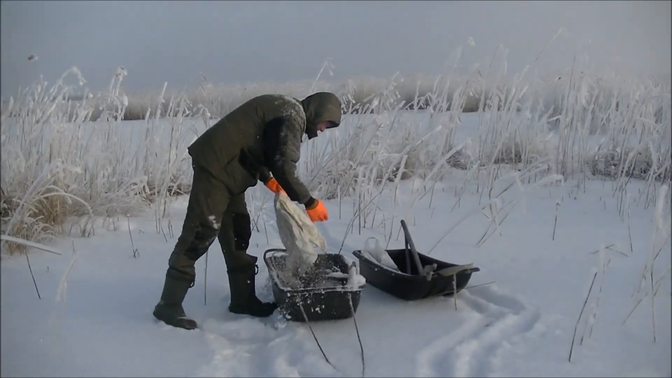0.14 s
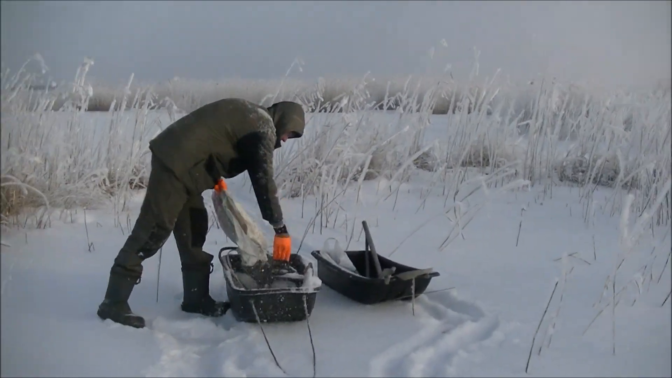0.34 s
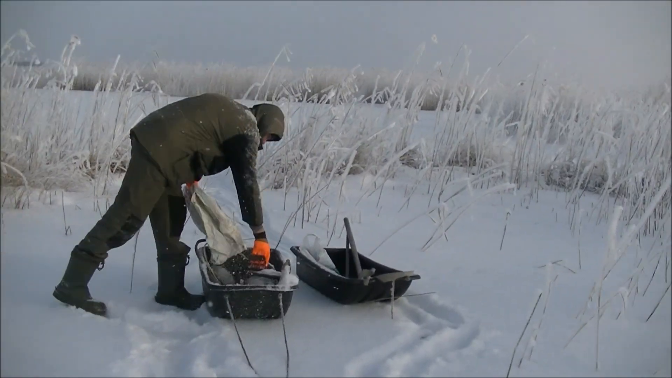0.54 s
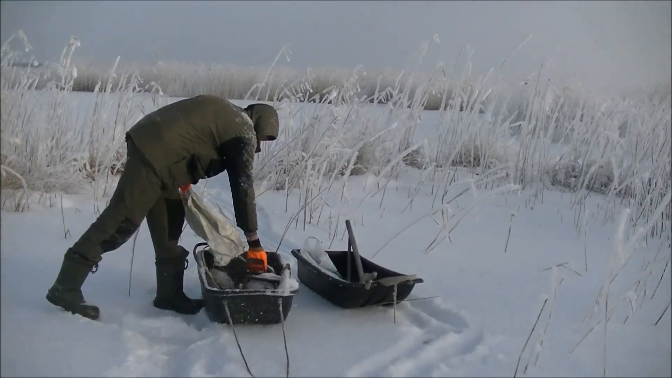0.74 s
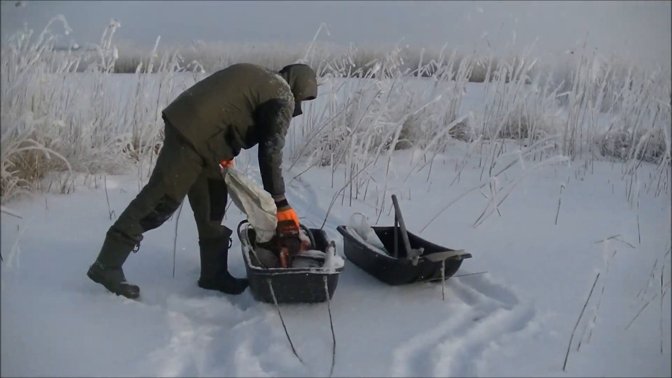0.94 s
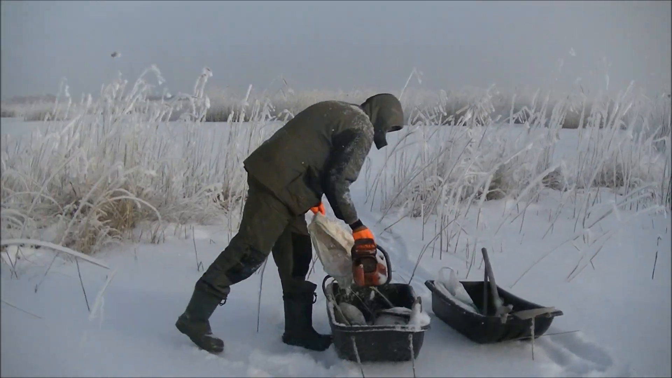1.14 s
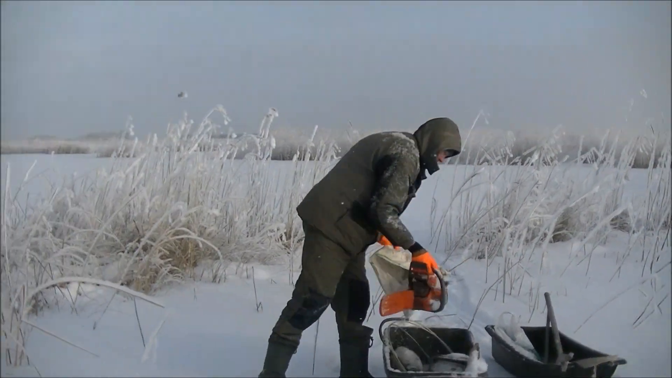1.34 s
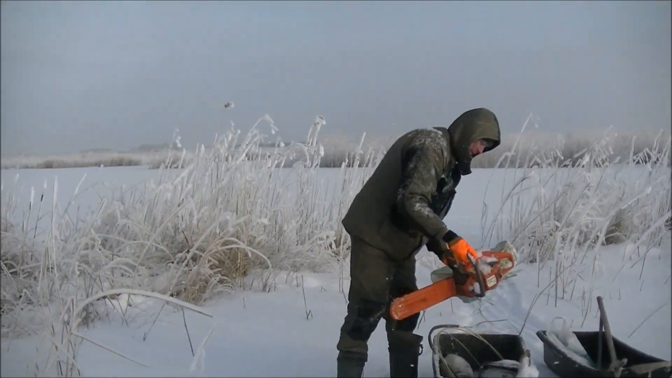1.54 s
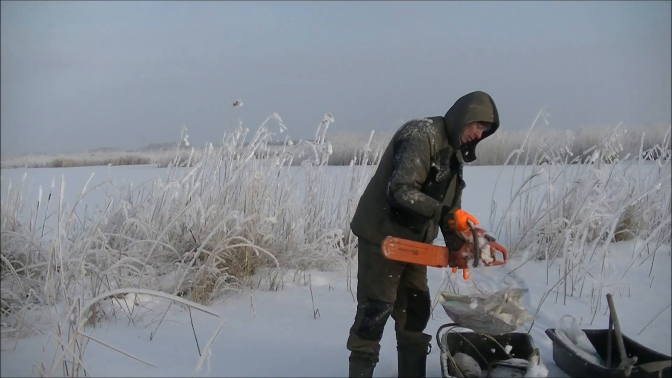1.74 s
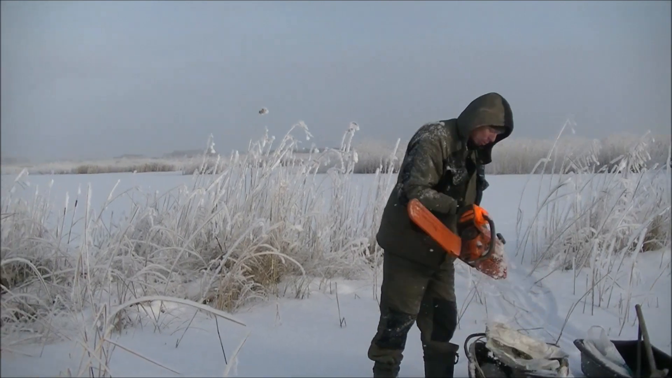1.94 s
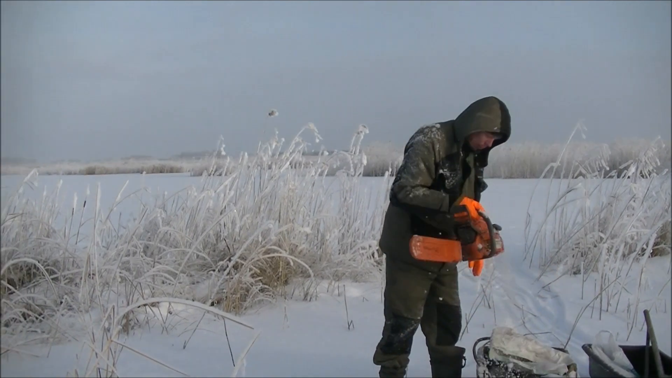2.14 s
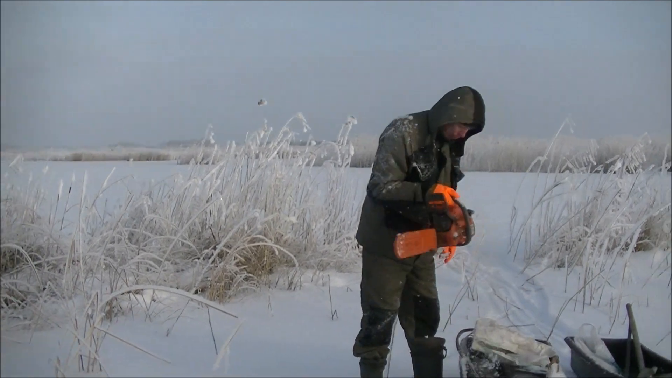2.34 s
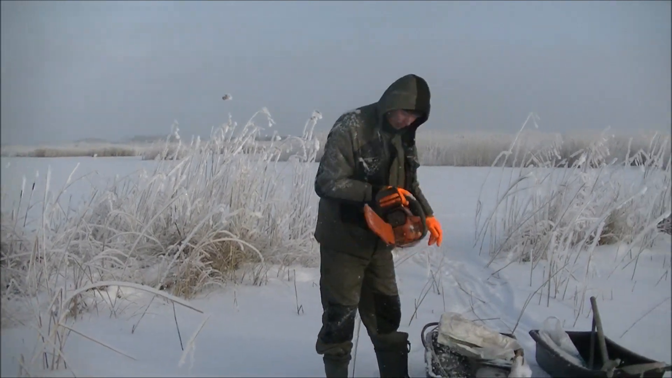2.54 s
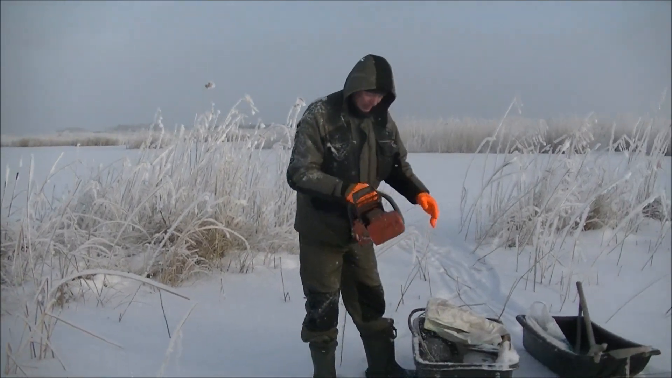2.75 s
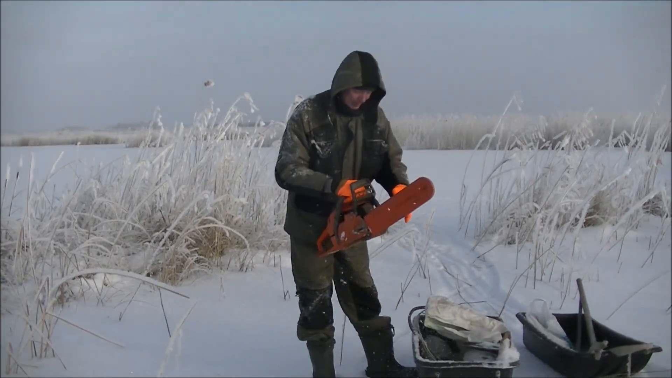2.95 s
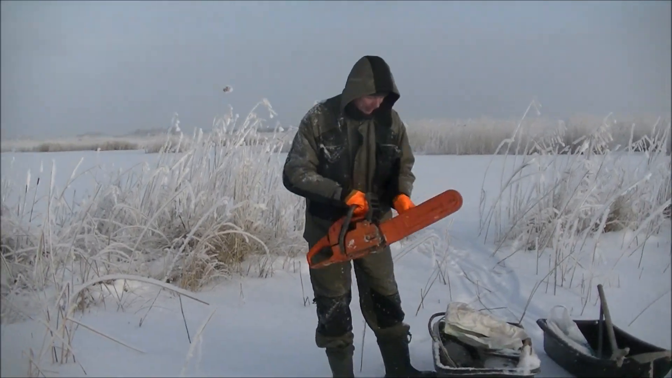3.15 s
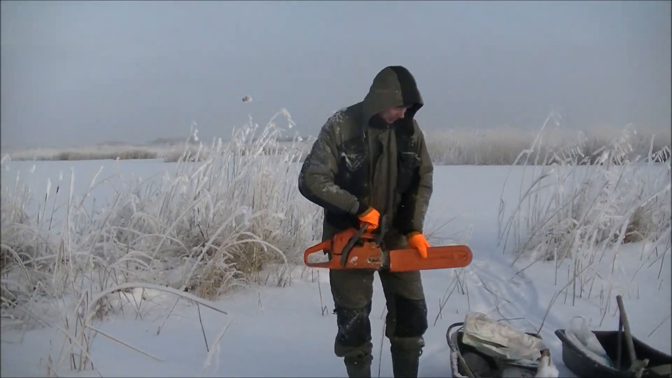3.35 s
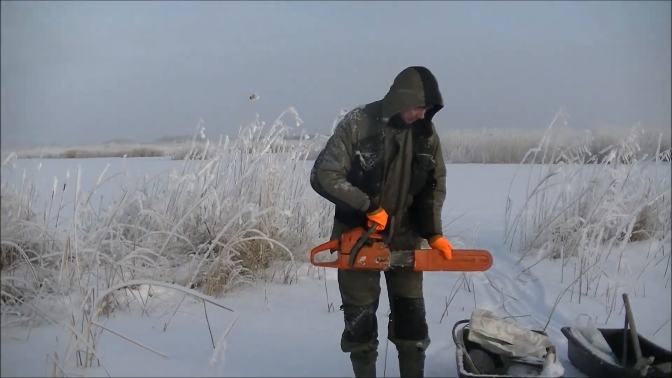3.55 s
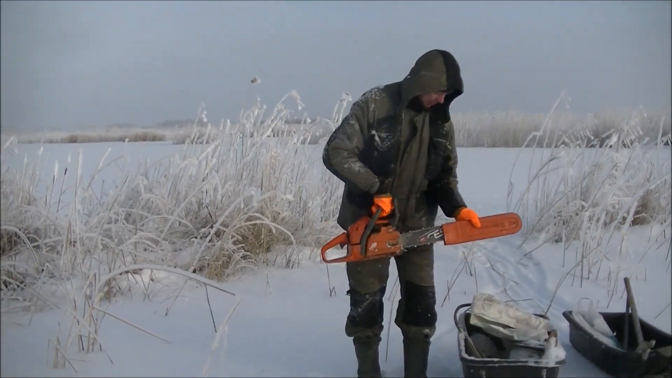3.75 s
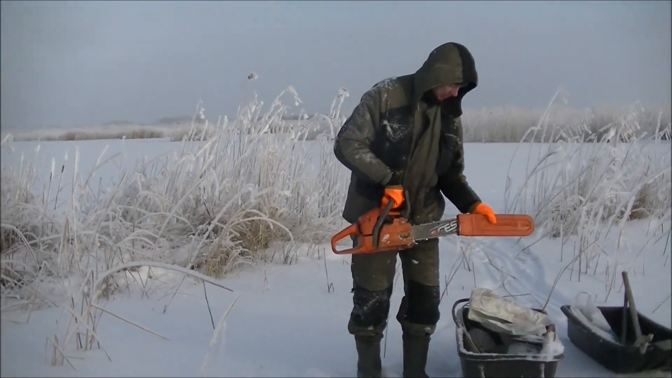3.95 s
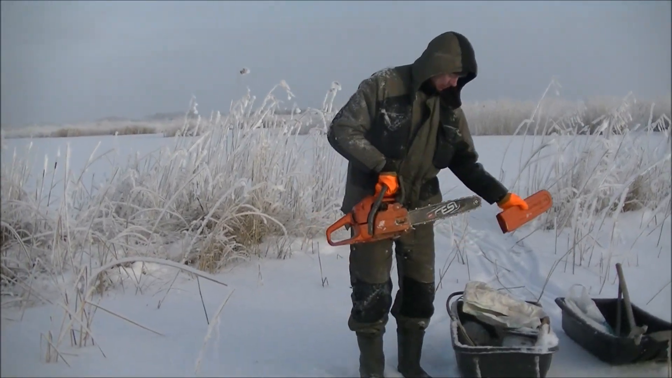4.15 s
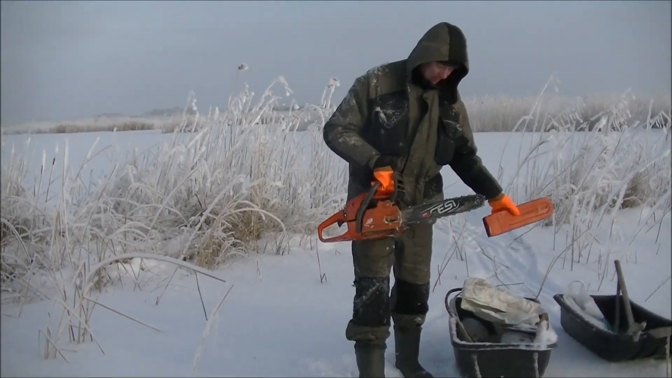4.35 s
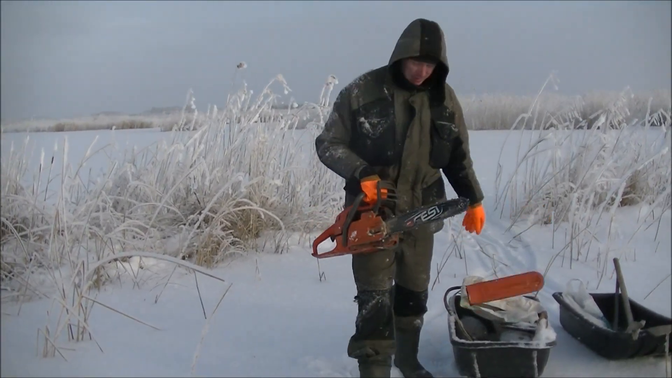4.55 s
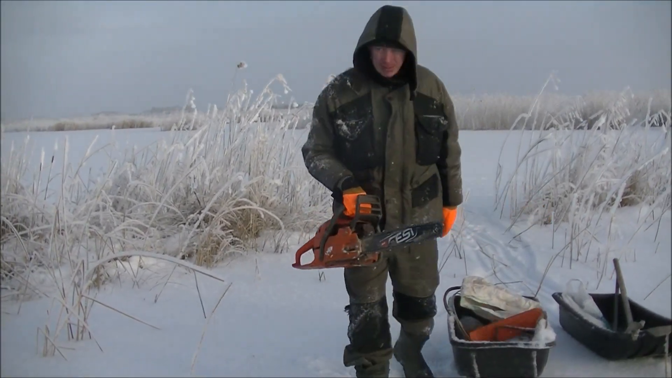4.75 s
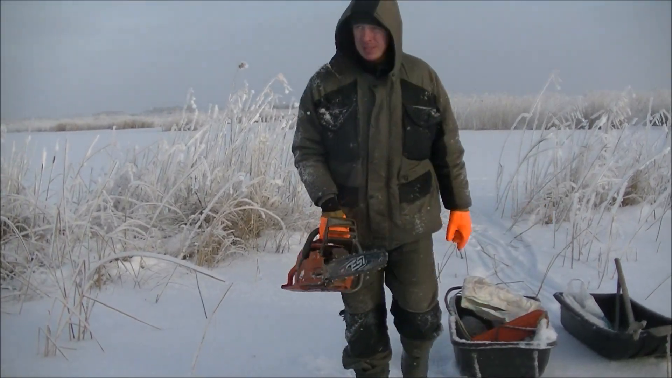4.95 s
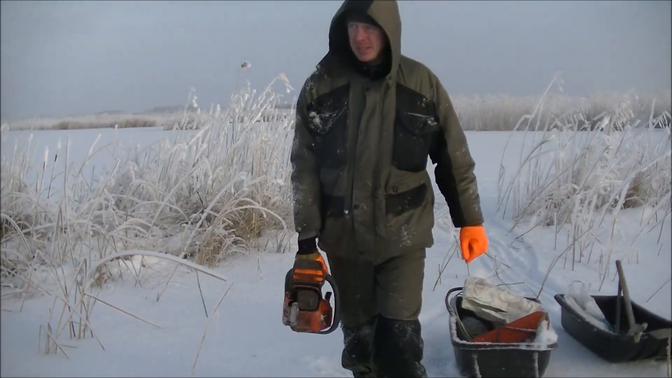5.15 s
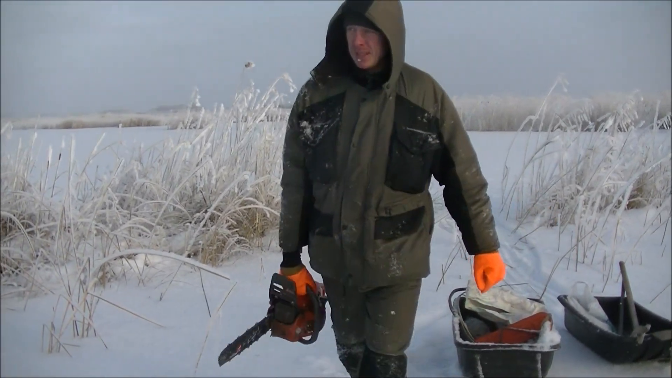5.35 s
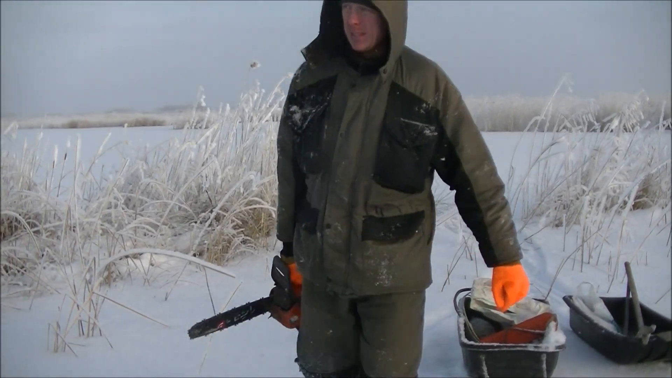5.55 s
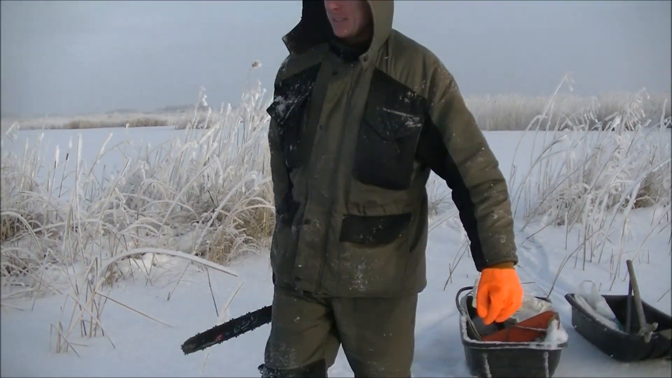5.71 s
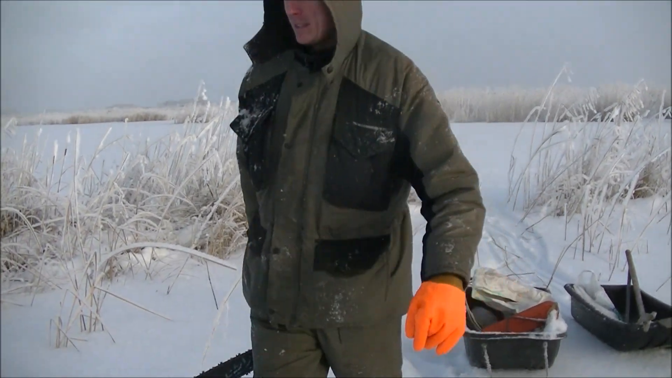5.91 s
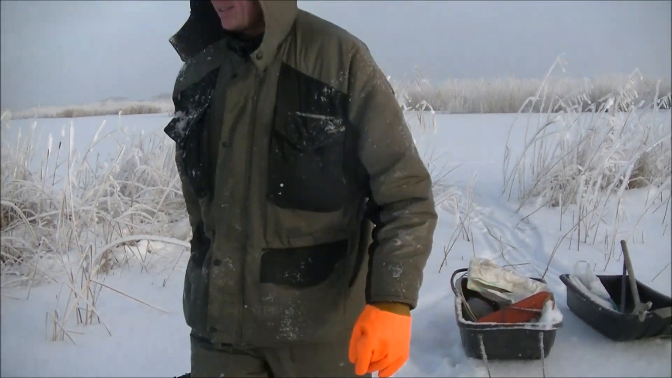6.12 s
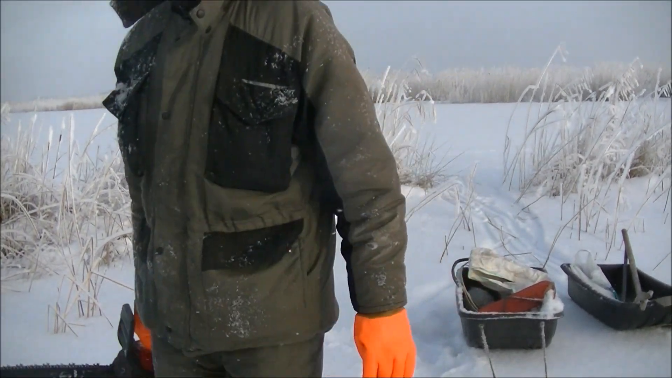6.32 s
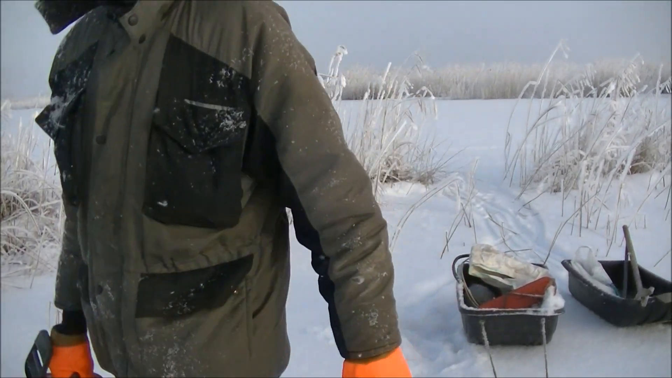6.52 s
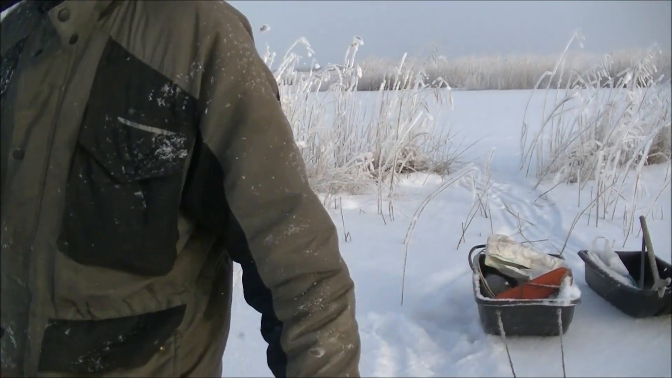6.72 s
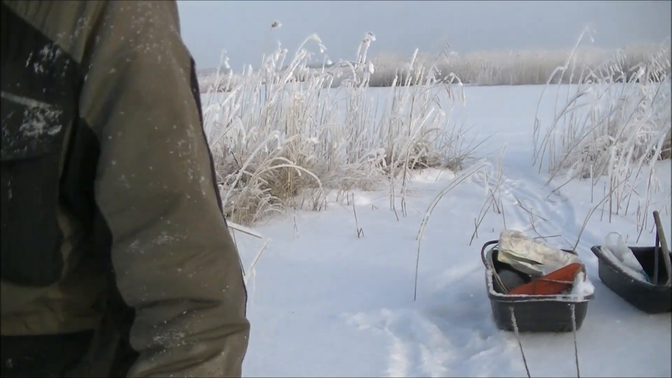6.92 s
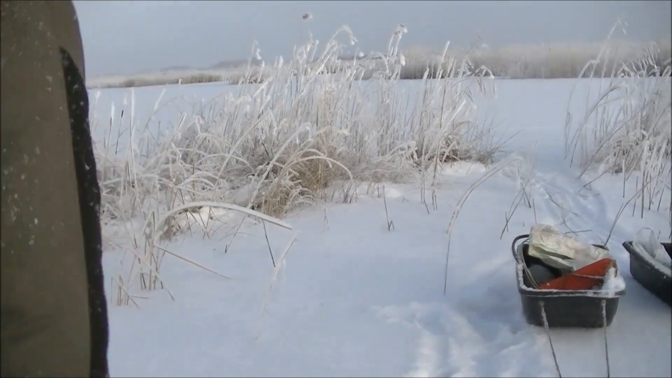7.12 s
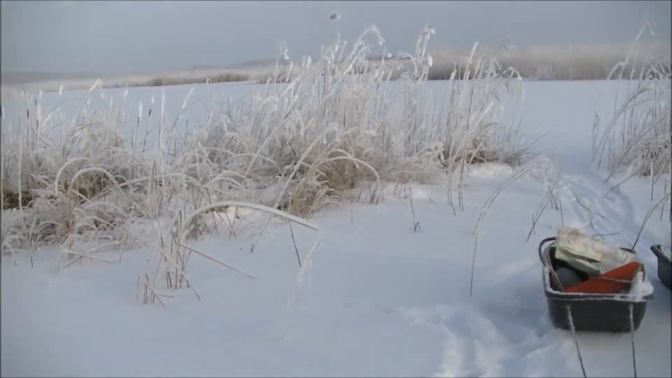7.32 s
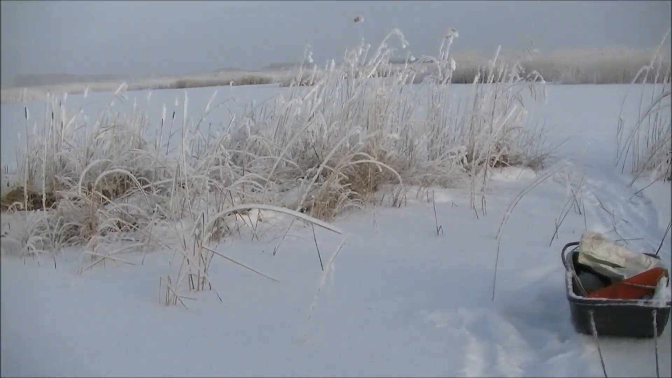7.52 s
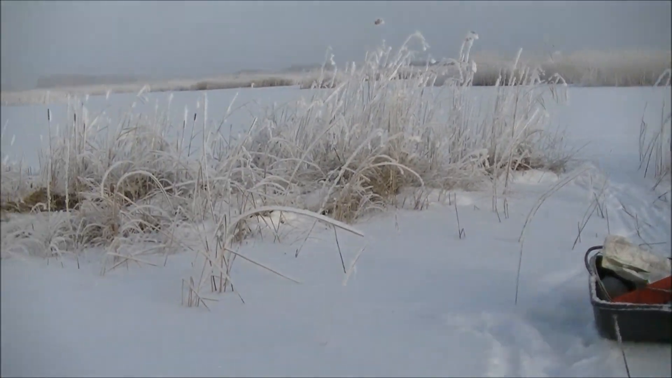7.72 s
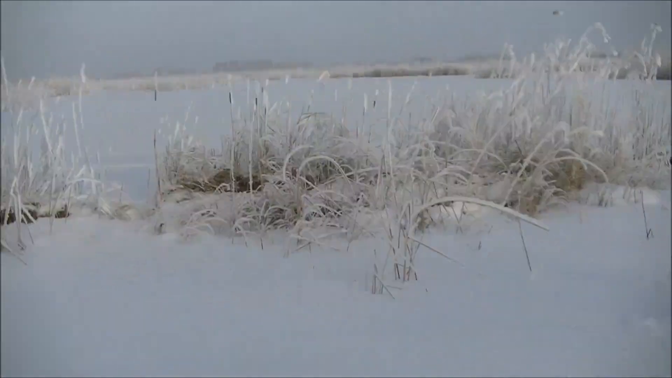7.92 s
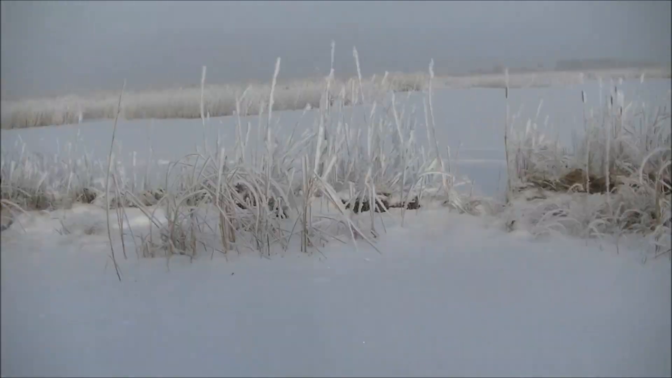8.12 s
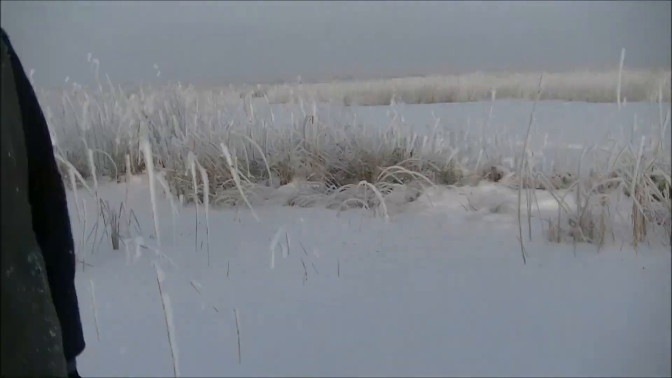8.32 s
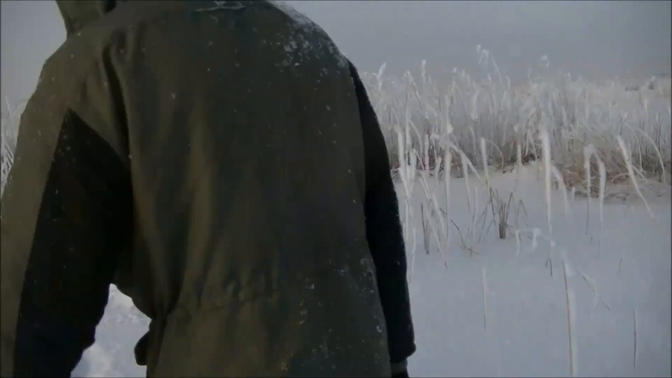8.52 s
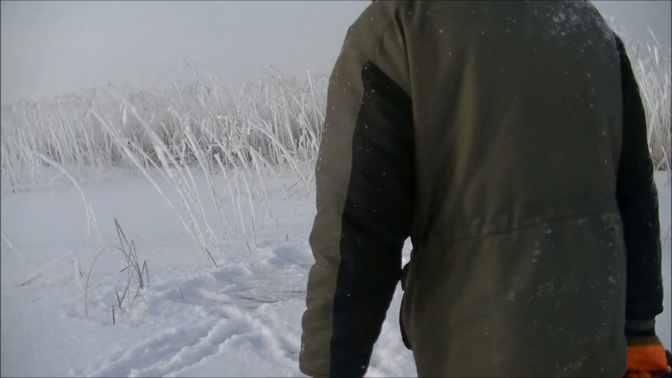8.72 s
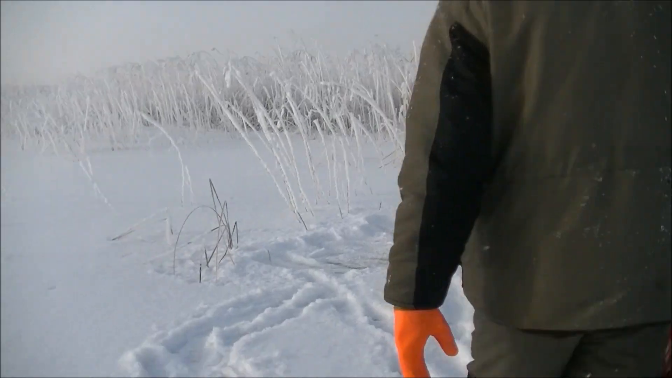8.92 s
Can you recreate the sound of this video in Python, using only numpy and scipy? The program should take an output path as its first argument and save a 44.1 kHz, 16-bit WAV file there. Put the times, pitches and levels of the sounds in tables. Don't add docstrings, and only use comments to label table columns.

```python
import sys
import numpy as np
from scipy import signal
from scipy.fft import rfft, irfft
from scipy.io import wavfile

SR = 44100
rng = np.random.default_rng(int(sys.argv[2]) if len(sys.argv) > 2 else 0)


def unload_wav(signal):
    wavfile.write(
        sys.argv[1],
        SR,
        np.round(np.clip(np.atleast_2d(signal).T, -1, 1) * 32767).astype(np.int16),
    )


def voltage_ratio(decibels):
    exponent = np.asarray(decibels, float) / 20
    return 10 ** exponent


N = 399987
SWELL_DB = 25
PASS_S = 6.97


def rms_one(x):
    return x / np.sqrt(np.mean(x ** 2) + 1e-20)


def at_hz(points, hz):
    point_hz, value = np.transpose(points)
    return np.interp(np.log(hz + 1), np.log(point_hz), value)


def band(x, low_hz, high_hz):
    return signal.sosfilt(signal.butter(2, [low_hz, high_hz], "band", fs=SR, output="sos"), x)


def colour(x, spectrum):
    size = 8192
    cepstrum = irfft(np.log(voltage_ratio(at_hz(spectrum, np.fft.rfftfreq(size, 1 / SR)))))
    cepstrum[1:size // 2] *= 2
    cepstrum[size // 2 + 1:] = 0
    response = irfft(np.exp(rfft(cepstrum)))[None, :size // 2]
    return signal.fftconvolve(x, response, axes=1)[:, :x.shape[1]]


def resonate(x, hz, width_hz):
    r = np.exp(-np.pi * width_hz / SR)
    top = [(1 - r * r) / 2, 0, (r * r - 1) / 2]
    return signal.lfilter(top, [1, -2 * r * np.cos(2 * np.pi * hz / SR), r * r], x)


def drift(rate_hz):
    r = np.exp(-2 * np.pi * rate_hz / SR)
    wander = signal.lfilter([1], [1, -2 * r, r * r], rng.standard_normal(N + SR))
    return rms_one(wander[SR:])


def burst(length, rise_s, t60, spike):
    t = np.arange(length) / SR
    x = rng.standard_normal((2, length)) * voltage_ratio(2.9 * rng.standard_normal(length))
    x = x * np.minimum(t / max(rise_s, 1e-5), 1)
    x = x * voltage_ratio(-60 * np.maximum(t - rise_s, 0) / t60)
    x[0, round(rise_s * SR)] += spike
    return x


def add(out, s, x, peak_db):
    i = max(round(s * SR), 0)
    out[:, i:i + x.shape[1]] += (x * voltage_ratio(peak_db) / np.abs(x[0]).max())[:, :N - i]


def grains(per_s, spread_db, clump_db, clump_rate):
    born = rng.random((2, N)) < per_s / SR
    sizes = voltage_ratio(spread_db * np.minimum(rng.exponential(1, (2, N)), 4.2))
    sizes = sizes * rng.choice([-1, 1], (2, N))
    return rms_one(born * sizes * voltage_ratio(clump_db * drift(clump_rate)) + 1e-9)


def creaks(source):
    dealt = rng.integers(0, 6, N)
    pitches = enumerate(np.geomspace(500, 4000, 6))
    return rms_one(sum(resonate(source * (dealt == k), hz, 0.59 * hz) for k, hz in pitches))


# heel fully down in seconds, sinking time in seconds,
# rolling time in seconds, heel level in dB, push-off level in dB.
BOOT_STEPS = [
    (0.0, .1, 0.45, -52, -44.5),
    (5.237, 0.36, 0.27, -46, -42.5),
    (5.88, 0.2, 0.28, -42, -38.5),
    (6.366, 0.28, 0.13, -43.5, -47),
    (6.535, 0.2, 0.27, -40, -36.5),
    (7.175, .24, 0.26, -37.5, -35.5),
    (7.8, 0.12, 0.26, -37, -37.5),
    (8.284, 0.38, 0.37, -38, -37.5),
    (9.069, 0.24, .1, -34, -33.5),
]


def footsteps():
    # lows in dB, highs in dB
    sink, heel, push, trickle = (-0.5, -11), (-6.5, 1.5), (-4.5, -1.6), (0.42, -4)
    lift = (-7.5, -4.5)
    moves = []
    for s, sink_s, roll_s, heel_db, push_db in BOOT_STEPS:
        off = s + roll_s + 0.027
        trickle_db = push_db - 19.5
        moves.append([(s - sink_s, heel_db - SWELL_DB, *sink),
                      (s, heel_db, *heel),
                      (s + 0.31 * roll_s, heel_db - 1.5, *push),
                      (s + 0.86 * roll_s, push_db, *push),
                      (s + roll_s, push_db - 1.5, *lift),
                      (off, trickle_db, *trickle),
                      (off + 0.21, trickle_db - 22, *trickle)])
    return moves


# time in seconds, effort in dB,
# speed as brightness in dB.
GEAR_HANDLING = [(0.0, -46, -3), (0.6, -48.5, -5), (0.75, -58.5, 3), (0.86, -44.5, 2.5), (1.29, -44, -1),
                 (1.52, -53.5, 6), (1.781, -50, -2.5), (2.0, -48, -3), (2.25, -53.5, -9), (2.53, -57.5, -7),
                 (2.69, -67, -19), (2.8, -53, -3), (3.17, -56, -7.5), (3.25, -60, 1), (3.4, -47.5, -2),
                 (3.95, -58, -4), (4.23, -63, -1), (5.1, -56, -2)]


def handling():
    return [[(s, db, -3.5, highs_db) for s, db, highs_db in GEAR_HANDLING]]


def swell(s, rise_s, fall_s, db, *tone):
    return [(s - rise_s, db - SWELL_DB, *tone), (s, db, *tone), (s + fall_s, db - SWELL_DB, *tone)]


# peak in seconds, rise in seconds, fall in seconds, level in dB, highs in dB.
SINGLE_SCRAPES = [(1.008, 0.16, 0.28, -31.5, -10), (1.207, .15, 0.19, -52, 7),
                  (1.68, 0.43, 0.15, -40.5, -1), (4.659, 0.27, 0.074, -42, -2.5),
                  (4.719, 0.053, 0.18, -34.5, -7.5), (4.86, 0.62, 0.59, -49, 0.5),
                  (2.35, 0.25, 0.061, -54, -7), (6.875, 0.11, 0.075, -52.5, 3),
                  (7.495, 0.042, 0.074, -49, 0), (7.638, 0.19, 0.29, -46, -3),
                  (8.74, 0.49, 0.26, -43.5, -6.5), (8.895, 0.18, 0.14, -44, -5.5)]


def scrapes():
    return [swell(*row[:4], -7, row[4]) for row in SINGLE_SCRAPES]


# peak in seconds, rise in seconds, fall in seconds,
# rub level in dB, ring level in dB.
COVER_TUGS = [
    (3.429, 0.11, 0.16, -45, -34),
    (3.627, 0.097, 0.083, -31.5, -40),
    (3.802, 0.11, .11, -31.5, -35.5),
    (4.035, 0.031, 0.17, -35.5, -45),
    (4.1, 0.11, 0.02, -37, -33),
    (4.85, 0.051, 0.28, -61, -46.5),
]


def tug_rubs():
    return [swell(*row[:4], -12.5, -9.5) for row in COVER_TUGS]


def pressure():
    t = np.arange(0, N / SR + .002, .002)
    power = 1e-15
    for move in handling() + footsteps() + scrapes() + tug_rubs():
        s, db, lows_db, highs_db = np.transpose(move)
        tone = np.array([np.interp(t, s, lows_db), 0 * t, np.interp(t, s, highs_db)])
        level_db = np.interp(t, s, db, left=-150, right=-150)
        power = power + voltage_ratio(2 * (level_db + tone))
    return [np.interp(np.arange(N) / SR, t, np.sqrt(p)) for p in power]


# frequency in Hz, level in dB per Hz.
SLED_COLOUR = [(24, -51), (40, -32), (249, -1), (467, 0), (810, 2), (1440, -1), (2100, 3), (3060, 0),
               (4030, 8.5), (5310, 1.5), (7000, -6), (8340, -15), (9220, -11.5), (14100, -17),
               (16000, -11.5)]
COMING_COLOUR = [(59, -47), (100, -14), (308, -6.5), (433, -12), (691, -5), (1250, -9.5), (2420, -4.5),
                 (4110, -1.5), (5420, -2), (6420, -2), (8280, -15), (13500, -12.5), (16000, -19)]
BEHIND_COLOUR = [(60, -44), (100, -13), (300, -2.5), (520, -7), (750, -5), (1300, -4.5), (2400, -3),
                 (3300, -5), (4300, 1.5), (4850, 6.5), (5450, 1.5), (6300, 1.5), (8500, -10.5),
                 (13500, -9.5), (16000, -11.5)]


def friction(source, flicker_db):
    low_gain, mid_gain, high_gain = pressure()
    cuts = [0, round(.76 * SR), round(5.65 * SR), round(PASS_S * SR), N]
    colours = BEHIND_COLOUR, SLED_COLOUR, COMING_COLOUR, BEHIND_COLOUR
    ranges = []
    for a, b, spectrum in zip(cuts, cuts[1:], colours):
        x = colour(source[:, a:b], spectrum)
        highs = band(band(x, 5600, 22000), 5600, 22000)
        ranges.append([rms_one(r) for r in (band(x, 36, 980), band(x, 1440, 4690), highs)])
    lows, mids, highs = np.concatenate(ranges, axis=2)
    lows = lows * voltage_ratio(-2 + flicker_db * drift(20))
    mids = mids * voltage_ratio(flicker_db * drift(31))
    return low_gain * lows - mid_gain * mids + high_gain * highs


# time
# in seconds, peak in dB, ring in Hz.
SNOW_CRUNCHES = [(0.032, -32.5, 650), (0.108, -34, 2120), (0.16, -29, 800), (0.199, -35, 1180),
                 (0.245, -32, 1160), (0.308, -33, 800), (0.357, -33, 705), (0.409, -33, 813),
                 (0.436, -32, 825), (0.468, -30, 900), (0.489, -28, 870), (1.274, -31, 818),
                 (1.416, -30, 1200), (1.483, -31, 720), (1.566, -33, 1670), (2.217, -37, 646),
                 (2.412, -41, 850), (2.455, -41, 800), (2.484, -42, 501), (2.56, -41, 800),
                 (5.013, -31.5, 636), (5.062, -29.5, 1070), (5.1, -32, 2190), (5.139, -33.5, 760),
                    (5.204, -32.5, 2190), (5.275, -29, 1830), (5.34, -29, 2150), (5.381, -27, 660),
                    (5.542, -28.5, 714), (5.548, -30, 800), (5.554, -31, 750), (5.72, -30.5, 1180),
                    (5.771, -27.5, 1040), (5.813, -28.5, 706), (5.854, -33, 1440), (6.292, -32.5, 610),
                    (6.335, -24.5, 680), (6.383, -29, 780), (6.49, -25, 830), (7.043, -31, 890),
                    (7.064, -30, 990), (7.093, -28, 1160), (7.128, -27, 859), (7.196, -23.5, 2340),
                    (7.225, -24.5, 2050), (7.266, -24, 2250), (7.318, -23, 1360), (7.614, -31, 711),
                    (7.652, -32.5, 1130), (7.697, -29.5, 824), (7.734, -27, 2140), (7.77, -23.5, 1427),
                 (5.896, -27.5, 1040), (5.936, -28.5, 1510), (5.974, -26, 1490), (6.01, -26, 1750),
                   (6.041, -23.5, 1640), (6.089, -28.5, 690), (6.141, -30, 674), (6.214, -37.5, 740),
                   (6.234, -41, 668), (6.421, -36, 894), (6.517, -27, 1880), (6.539, -31, 886),
                   (6.555, -26, 778), (6.601, -27.5, 1020), (6.63, -36, 773), (6.647, -35, 789),
                   (6.683, -27.5, 915), (6.724, -22, 905), (6.753, -31, 674), (6.769, -34, 689),
                 (7.165, -23.5, 2260), (7.292, -30, 2400), (7.358, -30, 2600), (7.484, -40, 864),
                    (7.592, -36, 711), (7.798, -33, 2600), (7.856, -30, 1740), (7.88, -33, 1420),
                    (7.899, -39, 2040), (7.927, -38, 1650), (7.939, -27, 1690), (7.972, -31, 2140),
                    (8.082, -33, 732), (8.108, -29.5, 1520), (8.133, -30, 1480), (8.166, -29.5, 1520),
                    (8.193, -34, 1530), (8.219, -35, 1620), (8.265, -39, 2090), (8.292, -33, 1640),
                    (8.373, -30, 896), (8.433, -24, 2120), (8.463, -25, 2400), (8.498, -27.5, 1990),
                    (8.533, -32, 2070), (8.575, -33, 2380), (8.654, -25, 2230), (8.711, -32, 573)]
COLLAPSES = SNOW_CRUNCHES


def crunches():
    out = np.zeros((2, N))
    for s, peak_db, hz in COLLAPSES:
        near = s > PASS_S
        t60, spike, width = (.05, 2.5, .5) if near else (.042, 4, .25)
        ring_gain, pack_gain, puff_gain = (1.9, 1.1, .6) if near else (2.9, 1.3, .4)
        x = burst(1300, rise_s=.004, t60=t60, spike=spike)
        ring = ring_gain * resonate(x, hz, width * hz)
        pack = pack_gain * resonate(x, 780, 560)
        puff = puff_gain * band(x, 156, 5300) + 0.1 * band(x, 5300, 12500)
        add(out, s - .002, ring + pack + puff, peak_db - 0.6)
    return out


def surges():
    t = np.arange(0, N / SR, .001)
    db = 0
    for s, *_ in COLLAPSES:
        for depth_db, width_s in (3, 0.018), (-2, 0.059):
            db = db + depth_db * np.exp(-((t - s - .004) / (0.35 * width_s)) ** 2)
    return voltage_ratio(np.interp(np.arange(N) / SR, t, db))


# time in seconds, peak in dB, ring in Hz, thud in dB against the peak,
# brightness in dB.
UNPACK_KNOCKS = [(0.545, -29.5, 1980, -5, -12), (0.787, -27, 4140, -5.5, -18), (0.883, -24, 1950, -28, -24),
                 (0.944, -21, 1880, -5, -16), (0.966, -16.5, 2200, -12.5, -21),
                 (1.021, -16.5, 2020, -11, -35), (1.075, -19, 2070, -8, -29), (1.182, -17, 2110, -8, -34),
                 (1.19, -18.5, 740, -5, -16), (1.342, -29, 1830, 0, -21.5), (1.66, -27, 4100, -7.5, -13)]
TURN_KNOCKS = [(1.98, -16.5, 2030, -15, -11), (2.009, -30, 869, 2, -21), (2.248, -32, 1350, -20, -37),
               (2.253, -28.5, 2750, -35, -37), (2.275, -31, 1830, -20, -26),
               (2.512, -26.5, 1310, -11.5, -44), (2.531, -34, 2600, -11, -40), (2.638, -26, 890, -5, -35),
               (2.645, -28, 730, -6, -40), (2.652, -33, 900, -5, -40), (2.682, -22.5, 3930, -26, -21),
               (2.778, -33.5, 1800, -11, -20), (2.79, -35, 4170, -18, -22), (2.865, -37, 1950, -24, -14),
               (3.084, -31.5, 1160, -1, -17), (3.153, -31.5, 836, -4, -25), (3.937, -29.5, 3230, -4.5, -10),
               (4.28, -35.5, 3600, -10, -12), (4.398, -28.5, 4100, -16, -13), (4.5, -34, 3770, -22, -11),
               (4.579, -28, 4100, -34, -11)]
CATCH_KNOCKS = [(3.448, -9.5, 4100, -40, -14), (3.452, -17, 950, -20, -20),
                (3.478, -14.5, 4000, -34, -10.5), (3.607, -21, 4030, -36, -9), (3.625, -14, 4000, -40, -28),
                (3.628, -14, 1093, -33, -32), (4.029, -27, 1970, -23, -30), (4.037, -26, 4040, -27, -30),
                (4.045, -19, 3630, -23, -25), (4.049, -11, 916, -34, -40), (4.0855, -16.5, 3400, -37, -23),
                (4.092, -17, 3230, -37, -25), (4.0965, -2.5, 4050, -38, -10), (4.099, -11, 1920, -27, -24)]
DROP_KNOCKS = [(4.693, -6.5, 940, -11, -29), (4.700, -14, 3700, -18, -21), (4.7025, -4.5, 2050, -4.5, -19),
               (4.705, -10, 660, -9, -28), (4.714, -15, 760, -8, -37), (4.833, -31, 883, 0, -25),
               (4.841, -18, 890, -7, -15), (4.852, -32, 895, -4, -30), (4.884, -22.5, 900, -12, -26),
               (4.897, -30, 900, -10, -30), (4.936, -31.5, 920, -4, -28), (4.949, -31, 820, -5, -16)]
# frequency in Hz, width in Hz, level in dB.
CASING_MODES = [(737, 22, 1.5), (894, 29, -3.5), (1163, 31, -8), (1350, 41, -12), (1975, 51, -7.5),
                (2350, 32, -4), (2700, 70, -4), (3330, 35, -2.5), (3760, 40, -8.5), (3900, 28, -6)]


def knock(hz, thud_db, bright_db, t60, rise_s, casing_db, width, top_db):
    x = burst(2600, rise_s=rise_s, t60=max(t60, .003), spike=6.3)
    crack = 3.7 * resonate(x, hz, width * hz)
    crack = crack + 1.0 * resonate(x, 3680, 780) + 0.78 * resonate(x, 1960, 920)
    for (mode_hz, width_hz, db), luck in zip(CASING_MODES, rng.normal(0, 2.8, len(CASING_MODES))):
        low_db = (thud_db + 6.5) * (mode_hz < 1200)
        crack = crack + voltage_ratio(db + luck + casing_db + low_db) * resonate(x, mode_hz, width_hz)
    thud = 4.04 * resonate(x, 863, 450) + 2.0 * resonate(x, 286, 92)
    dull = crack + voltage_ratio(thud_db + 0.5) * thud
    dull = band(band(dull, 77, 6450), 77, 6450)
    dull = signal.sosfilt(signal.butter(4, 6200, fs=SR, output="sos"), dull)
    return dull + voltage_ratio(bright_db + top_db) * band(x, 8000, 12000)


def knocks():
    kinds = [(UNPACK_KNOCKS, (0.096, .0005, 3.7, 0.058, 2.4)),
             (TURN_KNOCKS, (0.024, .0003, 14, 0.064, 5.9)),
             (CATCH_KNOCKS, (0.0255, .0008, 2, 0.12, 1)),
             (DROP_KNOCKS, (0.0467, .001, 4, .08, 6))]
    out = np.zeros((2, N))
    for rows, contact in kinds:
        rise_s = contact[1]
        for s, peak_db, *strike in rows:
            add(out, s - rise_s, knock(*strike, *contact), peak_db)
    return out


def hollow(tables, modes, source):
    rings = 0
    for k, (hz, width_hz, db) in enumerate(modes):
        ring = voltage_ratio(db) * resonate(source, hz, width_hz) * np.sqrt(500 / width_hz)
        rings = rings + (-1) ** k * ring
    gain = 0
    for rows in tables:
        s, level_db = np.transpose(rows)
        gain = gain + voltage_ratio(np.interp(np.arange(N) / SR, s, level_db, left=-150, right=-150))
    return rms_one(rings) * gain


# frequency in Hz, width in Hz, level in dB.
COVER_RINGS = [(696, 140, -31), (475, 120, -1), (970, 66, 8), (1830, 190, 0), (3300, 500, 1)]


def cover():
    rub = grains(2500, spread_db=-1.0, clump_db=3.0, clump_rate=46)
    return hollow([swell(*row[:3], row[4]) for row in COVER_TUGS], COVER_RINGS, rub)


# time in seconds, level in dB.
SLED_DRAGS = [
    [(0.8, -59), (1.052, -37), (1.32, -60)],
    [(4.68, -71), (4.708, -45.5), (5.0, -59.5)],
]
# frequency in Hz, width in Hz, level in dB.
SLED_RINGS = [(127, 56, -6), (198, 27, 1.5), (286, 74, -2.5)]


def sled():
    return hollow(SLED_DRAGS, SLED_RINGS, grains(400, spread_db=3.0, clump_db=1.5, clump_rate=23))


# start in seconds, length in seconds, pitch in Hz, peak in dB.
BOOT_SQUEAKS = [
    (8.853, 0.013, 3050, -37),
    (8.868, 0.008, 3400, -30.5),
    (8.871, 0.018, 2030, -35.5),
    (8.872, 0.014, 3750, -30.5),
    (8.886, 0.022, 3800, -34),
    (8.9, 0.026, 2400, -32),
]
SNOW_STRAINS = [(.3, 0.15, 4870, -40), (0.309, .24, 990, -35), (2.318, .07, 3700, -39),
                (2.40, 0.055, 3600, -42), (2.548, 0.037, 3800, -44), (5.546, 0.029, 3000, -38),
                (5.654, 0.041, 397, -48.5), (5.703, .04, 3500, -41), (5.85, .06, 4000, -36),
                (5.999, 0.092, 3600, -31), (6.09, 0.094, 3700, -34), (6.379, 0.12, 4100, -40),
                (6.386, .1, 730, -38.5), (6.67, 0.11, 2320, -29.5), (7.143, 0.083, 4750, -31),
                (7.292, 0.054, 4800, -31), (7.343, 0.12, 2500, -28), (7.532, 0.077, 2470, -46.5),
                (7.598, .07, 4930, -43), (7.761, .11, 4900, -28), (7.921, 0.15, 2210, -29),
                (7.929, .13, 4900, -30), (8.281, .1, 1800, -35), (8.501, 0.22, 5030, -35),
                (8.551, 0.15, 3680, -31), (8.7, 0.11, 5100, -38), (8.709, .09, 752.5, -39),
                (8.84, .09, 3200, -36), (8.901, .04, 4700, -37), (9.0, 0.081, 5100, -31)]


def squeaks():
    events = [(*row, 420) for row in BOOT_SQUEAKS]
    for s, length_s, hz, peak_db in SNOW_STRAINS:
        width = .45 if hz < 4400 else .15
        events.append((s, length_s, hz, peak_db, width * hz))
    out = np.zeros((2, N))
    for s, length_s, hz, peak_db, width_hz in events:
        x = rng.standard_normal((2, 12000)) * voltage_ratio(3.0 * rng.standard_normal(12000))
        x = resonate(resonate(x, hz, width_hz), hz, width_hz)[:, -round(length_s * SR):]
        add(out, s, x * signal.windows.tukey(x.shape[1], .7), peak_db)
    return out


# time in seconds, peak in dB, lowest frequency in Hz.
DRY_SNAPS = [
    (2.631, -35, 2700),
    (4.842, -23, 2800),
    (4.953, -26.5, 3024),
    (7.306, -26, 800),
    (7.383, -24, 1500),
    (7.417, -25, 900),
    (8.222, -31, 2700),
    (8.276, -32, 3240),
    (8.9459, -17.5, 500),
]


def snaps():
    out = np.zeros((2, N))
    for s, peak_db, low_hz in DRY_SNAPS:
        x = burst(400, rise_s=.0001, t60=0.0064, spike=3.7)
        add(out, s, band(x, low_hz, 4900), peak_db)
    return out


# frequency in Hz, likeness from 0 to 1.
PORT_LIKENESS = [(60, .995), (250, 1), (800, 0.98), (2200, 0.93), (5000, 0.92), (15000, 0.85)]
# frequency in Hz, width in Hz,
# share added on the left and taken from the right.
PORT_RINGS = [(605, 1300, 0.03), (1600, 1400, 0.11), (5610, 58, -3), (8900, 810, 0)]


def ports(x):
    alike = np.clip(at_hz(PORT_LIKENESS, np.fft.rfftfreq(N, 1 / SR)), 0, 1)
    side = irfft(np.sqrt((1 - alike) / (1 + alike)) * rfft(x[1]), N)
    for hz, width_hz, share in PORT_RINGS:
        side = side + share * resonate(x[0], hz, width_hz)
    mid = x[0] - 0.31 * resonate(x[0], 5620, 780)
    return np.array([mid + side, mid - side])


# frequency in Hz, level in dB per Hz.
AIR_COLOUR = [(13, -44), (22, -10.5), (263, -4.5), (2140, -15.5), (3060, -9.5), (4030, -8.5), (5310, -12.5),
              (13900, -20), (16000, -21)]


def still_air():
    common, left, right = colour(rng.standard_normal((3, N)), AIR_COLOUR)
    own = band(np.array([left, right]), 164, 20000)
    return voltage_ratio(-56.5) * rms_one(0.79 * common + own)


def scene():
    powder = grains(18000, spread_db=2.0, clump_db=1.5, clump_rate=23)
    crystals = creaks(grains(1500, spread_db=1.6, clump_db=1.6, clump_rate=40))
    rub = surges() * friction(powder + .5 * crystals, flicker_db=0.87)
    plastic = knocks() + cover() + sled()
    return ports(rub + crunches() + plastic + squeaks() + snaps()) + still_air()


def low_pass(x):
    return signal.sosfilt(signal.butter(12, 16820, fs=SR, output="sos"), x)


def record(dry):
    mix = signal.sosfilt(signal.cheby2(14, 70, 16380, fs=SR, output="sos"), dry)
    return low_pass(mix)


dry = scene()
out = record(dry)
unload_wav(out)
```